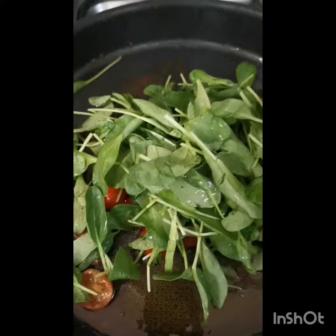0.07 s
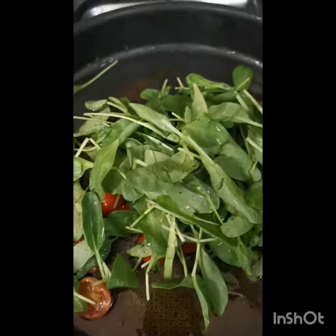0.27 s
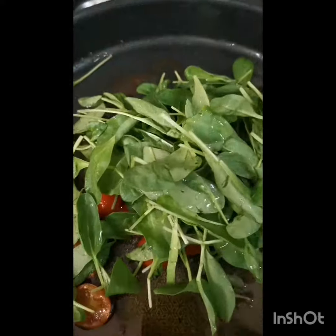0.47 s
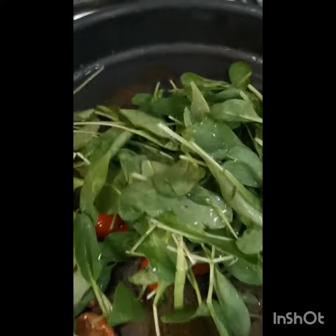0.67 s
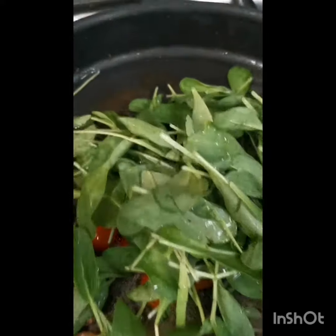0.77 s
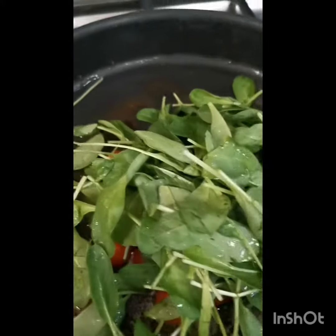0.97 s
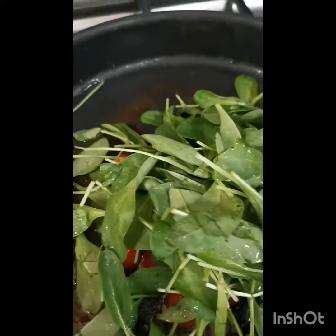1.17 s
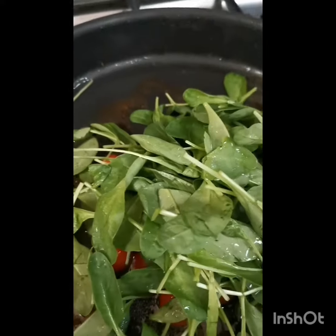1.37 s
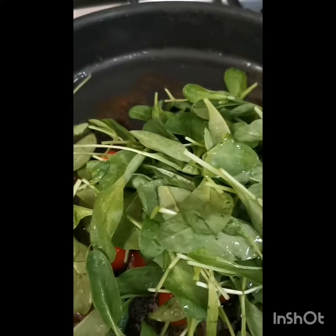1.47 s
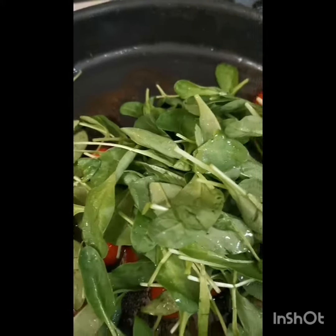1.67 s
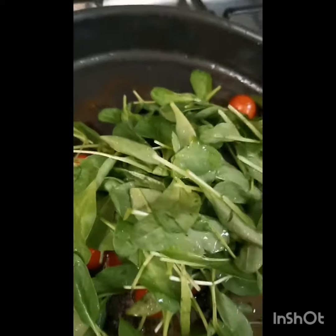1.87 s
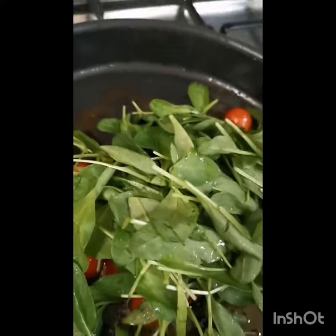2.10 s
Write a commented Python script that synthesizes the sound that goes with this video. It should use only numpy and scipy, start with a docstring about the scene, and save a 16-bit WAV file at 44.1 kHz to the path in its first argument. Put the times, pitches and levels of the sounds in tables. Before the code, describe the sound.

Faint frying hiss and low motor hum, a small bump at left, then a sudden close bang with gritty, crunching knocks and a short room tail; finally fingers tap and creak on the microphone's right side.

```python
"""Leaves sizzle quietly in a pan of butter in a small kitchen: shaped noise, partly tiny pops; a hiss fades first.
A sudden loud bang starts half a second of crackling clatter: noise bursts, scrape, ringing modes, room tail.
Fingers shift on the hand-held microphone: a bump on the left early on, taps and two short creaks on the right
at the end, from clicked resonances and noise. Behind it all: room rumble as noise, and the hum and whine
of a motor, probably a fridge, as wavering sines."""
import sys
import numpy as np
from scipy import signal
from scipy.fft import rfft, irfft
from scipy.io import wavfile

SR = 44100
rng = np.random.default_rng(int(sys.argv[2]) if len(sys.argv) > 2 else 0)


def unload_wav(signal):
    """Save mono or channel-first audio to the path in sys.argv[1] as 16-bit WAV at rate SR, clipped to [-1, 1]."""
    wavfile.write(
        sys.argv[1],
        SR,
        np.round(np.clip(np.atleast_2d(signal).T, -1, 1) * 32767).astype(np.int16),
    )


N = 94197
T = np.arange(N) / SR


def from_db(db):
    """Decibels to gain."""
    return 10 ** (np.asarray(db) / 20)


def rms_one(x):
    """Scale to unit power."""
    return x / np.sqrt(np.mean(x ** 2) + 1e-20)


def level(rows):
    """Gain that follows (time [s], level [dB]) points."""
    return from_db(np.interp(T, *np.transpose(rows)))


def at_hz(points, hz):
    """Read (frequency [Hz], value) points on a log axis."""
    p = np.array(points)
    return np.interp(np.log(hz + 1e-9), np.log(p[:, 0]), p[:, 1])


def lowpass(x, hz, order=2):
    """Butterworth low-pass."""
    return signal.sosfilt(signal.butter(order, min(hz, SR / 2 - 100), fs=SR, output="sos"), x)


# left-right likeness of near and far sound: (frequency [Hz], correlation [-1..1])
NEAR_LIKENESS = [(100, .97), (280, 1), (500, 0.98), (1200, 0.17), (3000, 0.15), (8000, 0.27)]
FAR_LIKENESS = [(30, 1), (120, 0.96), (280, 0.95), (550, 0.1), (1200, 0.036), (3000, 0.05), (8000, 0.9)]


def noise(colour, likeness, grains_per_s=1000, share=0):
    """Coloured stereo noise of unit power, a share of it made of tiny pops of uneven size."""
    hz = np.arange(N // 2 + 1) * SR / N
    share = np.clip(share, 0, 1)
    happens = rng.random((2, N)) < grains_per_s / SR
    size = from_db(2.35 * np.minimum(rng.exponential(1, (2, N)), 4))
    pops = happens * size * rng.choice([-1, 1], (2, N))
    steady = rng.standard_normal((2, N))
    mid, side = rfft(np.sqrt(1 - share) * steady + np.sqrt(share) * rms_one(pops))
    alike = np.clip(at_hz(likeness, hz), -1, 1)
    both = np.sqrt(1 + alike) * mid + np.sqrt(1 - alike) * side * [[1], [-1]]
    return rms_one(irfft(both * from_db(at_hz(colour, hz)), N))


def octaves(x):
    """Split a steady noise into overlapping octaves that add up to it: (Hz, band) pairs."""
    centres_hz = 125 * 2. ** np.arange(7)
    spectrum = rfft(x)
    hz = np.arange(N // 2 + 1) * SR / N
    return [(c, irfft(spectrum * at_hz(np.c_[centres_hz, centres_hz == c], hz), N)) for c in centres_hz]


def strike(s, attack, t60):
    """Envelope: straight rise, exponential fall."""
    rise = np.clip((T - s) / attack, 0, 1)
    return rise * from_db(-60 * np.clip((T - s - attack) / t60, 0, 2))


def linger(power, t60):
    """Let a power envelope die away slowly, keeping its energy."""
    r = np.exp(-np.log(1e6) / (t60 * SR))
    return signal.lfilter([1 - r], [1, -r], power + 1e-18)


def clicks(times, db):
    """Single impulses at the given times and levels."""
    out = np.zeros(N)
    samples = np.clip((np.asarray(times) * SR).astype(int), 0, N - 1)
    np.add.at(out, samples, from_db(db))
    return out


def ring(x, hz, t60):
    """Two-pole resonator: a unit click sets a sine of height 1 ringing."""
    r = np.exp(-np.log(1000) / (t60 * SR))
    w = 2 * np.pi * hz / SR
    return signal.lfilter([0, np.sin(w)], [1, -2 * r * np.cos(w), r * r], x + 1e-18)


# frying loudness: (time [s], level [dB])
SIZZLE_LEVEL = [(0, -52), (.07, -59.5), (.16, -61.5), (.23, -60), (.27, -55), (.41, -63.5), (.52, -52.5),
                (.64, -56.5), (.71, -56.5), (1.03, -58.5), (1.7, -60.5), (2.13, -63)]
# frying spectrum: (frequency [Hz], level [dB])
SIZZLE_COLOUR = [(600, 19), (1200, 1.5), (2000, -6.5), (2700, 6), (3200, 3.5), (3700, 4.5), (4400, -5.5),
                 (5200, 8), (6300, 0.5), (7200, 7.5), (7800, 10), (8700, -1.5), (9800, -8), (11000, -15),
                 (14500, -18), (16000, -38)]
SIZZLE_GRAINS_PER_S, SIZZLE_GRAIN_SHARE = 2500, 0.22


def sizzle():
    """Thousands of tiny steam pops a second merge into a soft hiss."""
    return level(SIZZLE_LEVEL) * noise(SIZZLE_COLOUR, FAR_LIKENESS, SIZZLE_GRAINS_PER_S, SIZZLE_GRAIN_SHARE)


# hiss dying away at the start: (time [s], level [dB])
FADING_HISS_LEVEL = [(0, -47.5), (.04, -53.5), (.08, -58), (.15, -61), (.22, -95)]
# its resonant spectrum: (frequency [Hz], level [dB])
FADING_HISS_COLOUR = [(1000, -29), (2100, -21), (2400, 8), (2700, 7), (3200, -12), (3700, 3), (4200, 1.5),
                      (5000, -6), (6200, -7), (7700, -6), (9000, -24), (12000, -45)]


def fading_hiss():
    """Noise with resonant spectral peaks dies away."""
    return level(FADING_HISS_LEVEL) * noise(FADING_HISS_COLOUR, FAR_LIKENESS)


# bang and after-knocks: (time [s], level [dB], tilt [dB/octave], attack [s], t60 [s])
KNOCKS = [(1.063, -11.5, 2, .0045, 0.068), (1.104, -37, 6.5, 0.0025, 0.12),
          (1.1346, -18.5, -1.5, 0.00206, 0.064), (1.172, -23, -3, 0.0035, 0.031),
          (1.213, -26, -1, 0.00308, 0.035), (1.249, -35, -1.5, 0.0021, 0.11),
          (1.343, -35.5, 4.5, 0.00126, 0.067), (1.352, -31.5, 2, 0.0016, 0.045),
          (1.377, -36.5, 3, 0.0007, 0.1), (1.4531, -32.5, 1, 0.00061, 0.048),
          (1.468, -34, -3, 0.00242, 0.065)]
# crunch spectrum of a knock: (frequency [Hz], level [dB])
KNOCK_COLOUR = [(30, -18), (100, -9), (165, -9), (255, 6), (350, -3), (500, 10), (600, 3), (700, -0.5),
                (820, -8), (1000, -2), (1200, 5), (1500, -6), (2000, -4), (2450, 4.5), (3200, -11),
                (4500, -14.5), (5800, -12.5), (7600, -6), (8700, -13.5), (10000, -31.5), (14500, -35),
                (16000, -55)]
# crackling scrape between the knocks: (time [s], level [dB])
SCRAPE_LEVEL = [(1.06, -58), (1.08, -32.5), (1.16, -36.5), (1.255, -32.5), (1.29, -40), (1.34, -37.5),
                (1.39, -36.5), (1.44, -41.5), (1.475, -41.5), (1.53, -46), (1.6, -61)]
# spectrum of scrape and room tail: (frequency [Hz], level [dB])
CLATTER_COLOUR = [(30, -28), (110, 6), (180, 2), (270, 0), (340, 0), (540, 8), (680, 4), (850, -2),
                  (1100, 2), (1600, 2.5), (2500, 1.5), (3200, -2.5), (4100, -4.5), (5200, -6.5), (6500, -8),
                  (7900, -8), (8800, -18.5), (10200, -33.5), (14500, -43), (16000, -55)]
SCRAPE_GRAINS_PER_S, SCRAPE_GRAIN_SHARE = 1500, 0.91
ROOM_T60_AT_1KHZ_S, ROOM_TREBLE_LOSS, ROOM_DB, ROOM_BUILD_S = 0.73, 0.033, -9.5, 0.02
TILT_FROM_HZ = 670  # tilt is constant below this


def clatter():
    """Each knock is a rough crunch; a gritty scrape joins them, and both fill the room."""
    crunch = octaves(noise(KNOCK_COLOUR, NEAR_LIKENESS, grains_per_s=4400, share=0.52))
    wash = octaves(noise(CLATTER_COLOUR, FAR_LIKENESS))
    scrape = level(SCRAPE_LEVEL)
    out = scrape * noise(CLATTER_COLOUR, NEAR_LIKENESS, SCRAPE_GRAINS_PER_S, SCRAPE_GRAIN_SHARE)
    for (hz, direct), (_, diffuse) in zip(crunch, wash):
        height_octaves = np.log2(max(hz, TILT_FROM_HZ) / 1000)
        power = sum((from_db(db + tilt * height_octaves) * strike(s, attack, t60)) ** 2
                    for s, db, tilt, attack, t60 in KNOCKS)
        delayed = np.interp(T - ROOM_BUILD_S, T, power + scrape ** 2)
        tail = linger(delayed, ROOM_T60_AT_1KHZ_S * 2 ** (-ROOM_TREBLE_LOSS * height_octaves))
        out = out + np.sqrt(power) * direct + from_db(ROOM_DB) * np.sqrt(tail) * diffuse
    return out


# modes of the struck thing: (frequency [Hz], level [dB], t60 [s], left minus right [dB])
MODES = [(232, -10, 0.061, 2.5), (271.6, -16.5, 0.27, -1), (394, -24, 0.43, -7), (495.5, -14, 0.43, -4.5),
         (531, -5.5, 0.063, -11), (617.6, -30, 1, -12), (715, -29.5, 0.69, -8), (1045, -28.5, 0.82, 8),
         (1230, -21, 0.21, 4), (1496, -29.5, 0.58, 3), (1980, -39, 0.4, 5), (2326, -34, 0.2, 14),
         (2710, -30, 0.92, 1), (2755, -45, 0.15, 0)]
EAR_LAG_S, STRIKE_SPREAD_DB = .0003, 1.5


def ringing():
    """The knocks set the same modes ringing, each with small random lags and a fixed level offset per ear."""
    s, db, tilt, attack, _ = np.transpose(KNOCKS)
    out = np.zeros((2, N))
    for hz, mode_db, t60, pan_db in MODES:
        tilt_db = tilt * np.log2(max(hz, TILT_FROM_HZ) / 1000)
        strength_db = db + mode_db + tilt_db + rng.normal(0, STRIKE_SPREAD_DB, len(s))
        when = s + attack * rng.uniform(0.19, 1, len(s))
        lags = rng.uniform(0, EAR_LAG_S, 2)
        out += [ring(clicks(when + lag, strength_db + side * pan_db), hz, t60)
                for lag, side in zip(lags, (.5, -.5))]
    return out


# sharp spits in the clatter: (time [s], level [dB])
SPITS = [(1.0678, -9), (1.0712, -12), (1.0812, -16), (1.1365, -20), (1.3436, -21), (1.3545, -21),
         (1.379, -24), (1.453, -18)]
# low thumps under the main knocks: (time [s], level [dB])
THUMPS = [(1.066, -35), (1.348, -40.5), (1.455, -40)]
SPIT_T60_S, SPIT_DULL_HZ, THUMP_T60_S = 0.0091, 7900, .22


def spits():
    """Noise snaps of a few milliseconds on top of the knocks, and low noise thumps beneath them."""
    snaps = sum(from_db(db) * strike(s, .0001, SPIT_T60_S) for s, db in SPITS)
    thumps = sum(from_db(db) * strike(s, 0.0033, THUMP_T60_S) for s, db in THUMPS)
    bright = noise([(300, -6), (2500, 1.5), (5000, -4.5), (8000, -15.5), (11000, -2)], NEAR_LIKENESS)
    low = noise([(25, -29), (70, 3.5), (120, -2), (180, -5), (400, -22), (1500, -62)], NEAR_LIKENESS)
    return lowpass(snaps * bright, SPIT_DULL_HZ, order=8) + thumps * low


# microphone port resonances: (frequency [Hz], level [dB], t60 [s])
PORT_MODES = [(1460, -15.5, 0.0054), (2220, -10.5, 0.0032), (5400, -28, 0.0008), (7960, -1, 0.0015)]


def port(x):
    """A click right at the microphone port rings for a few milliseconds."""
    rings = sum(from_db(db) * ring(x, hz, t60) * sign
                for (hz, db, t60), sign in zip(PORT_MODES, (1, 1, -1, -1)))
    return lowpass(rings, hz=8700, order=4)


# finger taps on the right: (time [s], thud level [dB], tick level [dB])
TAPS = [(1.855, -21.5, -26), (1.8993, -28.5, -22.5), (1.903, -21, -25), (1.938, -51, -27),
        (1.943, -21.5, -21), (1.9582, -39, -17.5), (2.036, -25.5, -25), (2.047, -42, -25.5),
        (2.0705, -43, -39), (2.0772, -25.5, -36), (2.1087, -70, -34), (2.1126, -54, -24),
        (2.121, -26.5, -43)]
# microphone body: (frequency [Hz], level [dB], t60 [s])
BODY_MODES = [(324, 3.5, 0.004), (133, -11, 0.01)]
# stick-slip creaks of a finger: (time [s], length [s], level [dB])
CREAKS = [(1.965, .0005, -15.5), (1.9718, .0005, -11), (1.9817, .0135, -12), (1.999, .0005, -14),
          (2.0825, .0056, -10), (2.0901, .0028, -14.5)]
TICK_HZ, TICK_T60_S = 1650, 0.001
SLIP_S, SLIP_JITTER = .0019, .2  # median gap, log-normal spread
RUB_DB, RUB_T60_S, LEAK_DB, TOUCH_ROOM_DB = -23, 0.026, -37, -34


def fingers():
    """Soft taps and runs of sharp slips at the right port; little reaches the left."""
    s, thud_db, tick_db = np.transpose(TAPS)
    thuds = sum(from_db(db) * ring(clicks(s, thud_db), hz, t60) for hz, db, t60 in BODY_MODES)
    ticks = clicks(s, tick_db)
    slips = np.zeros(N)
    for start, length, db in CREAKS:
        gaps = SLIP_S * np.exp(SLIP_JITTER * rng.standard_normal(20))
        offsets = np.cumsum(gaps) - gaps
        slips += clicks(start + offsets[offsets < length], db)
    power_decay = from_db(-120 / (RUB_T60_S * SR))
    skin = np.sqrt(signal.lfilter([1], [1, -power_decay], (ticks + slips) ** 2 + 1e-18))
    rub = from_db(RUB_DB) * skin * rms_one(port(rng.standard_normal(N)))
    room_colour = [(300, 0), (1500, -4), (2400, 5), (4000, 3), (6200, -9), (7700, -7), (10000, -30), (16000, -45)]
    room = from_db(TOUCH_ROOM_DB) * skin * noise(room_colour, FAR_LIKENESS)
    direct = thuds + ring(ticks, TICK_HZ, TICK_T60_S) + port(slips) + rub
    return direct * from_db([[LEAK_DB], [0]]) + room


# ticks of the bump on the left: (time [s], level [dB], frequency [Hz], t60 [s])
BUMP_TICKS = [(0.0998, -35, 3960, 0.018), (.112, -40, 7900, 0.014), (.1168, -46, 4000, 0.014)]
# spectrum of its low wobble: (frequency [Hz], level [dB])
WOBBLE_COLOUR = [(15, -3), (38, 7), (90, -2), (150, -18), (400, -38), (1500, -67)]
WOBBLE_S, WOBBLE_END_S, WOBBLE_FADE_S, WOBBLE_DB = .098, .232, .01, -36
BUMP_RIGHT_DB, TICK_CYCLES = -34, 6  # right relative to left; resonator t60 in cycles


def bump():
    """The grip shifts by the left port: three short resonant noise ticks and a low noise wobble."""
    ticks = sum(from_db(db) * strike(s, 0.00017, t60)
                * rms_one(ring(rng.standard_normal(N), hz, TICK_CYCLES / hz))
                for s, db, hz, t60 in BUMP_TICKS)
    gate = np.clip(np.minimum(T - WOBBLE_S, WOBBLE_END_S - T) / WOBBLE_FADE_S, 0, 1)
    wobble = from_db(WOBBLE_DB) * gate * noise(WOBBLE_COLOUR, NEAR_LIKENESS)[0]
    return (ticks + wobble) * from_db([[0], [BUMP_RIGHT_DB]])


def tones(lines, spread, waver):
    """Steady sine lines, slightly wavering in phase; spread sets the phase differences between the ears."""
    out = 0
    for hz, db in lines:
        phase = rng.uniform(0, 2 * np.pi) + spread * rng.uniform(-1.27, 1, (2, 1))
        slow = np.interp(T, np.linspace(0, T[-1], num=24), rng.standard_normal(24))
        out = out + np.sqrt(2) * from_db(db) * np.sin(2 * np.pi * hz * T + phase + waver * slow)
    return out


# room rumble: (time [s], level [dB])
RUMBLE_LEVEL = [(0, -51.5), (.4, -48), (.9, -49), (1.6, -53), (1.8, -46.5), (2.13, -60)]
# its spectrum: (frequency [Hz], level [dB])
RUMBLE_COLOUR = [(20, 5), (40, 4), (80, 6.5), (120, 10.5), (165, -5), (240, 2), (340, -6.5), (420, -7),
                 (650, -22.5), (1200, -16), (3000, -55.5)]
# motor hum lines: (frequency [Hz], level [dB])
HUM_LINES = [(118.4, -58), (236.9, -60), (301.5, -64), (409.1, -67)]
# motor whine lines: (frequency [Hz], level before swell [dB])
WHINE_LINES = [(2649, -73), (2708, -69), (2767, -69), (2944, -72), (5356, -82), (5771, -82), (6476, -84),
               (7714, -79), (8183, -81), (15120, -90)]
# swell of whine and buzz: (time [s], level [dB])
WHINE_SWELL = [(0, -2), (.2, -4), (.45, 2), (.7, 2.5), (1.0, 3.5), (1.6, -1), (1.8, -0.5), (2.13, -4.5)]
# spectrum of the buzz around the whine: (frequency [Hz], level [dB])
BUZZ_COLOUR = [(2300, -32), (2580, -11), (2680, 2), (2780, 3), (2870, -9), (2960, -3), (3150, -30),
               (5500, -32), (5790, -5), (6000, -34), (9000, -50)]
BUZZ_BEFORE_SWELL_DB, MOTOR_LAG_S = -69, .0003


def kitchen():
    """Room rumble and motor hum, reaching the left ear later; high whining lines and the buzz around them."""
    rumble = level(RUMBLE_LEVEL) * noise(RUMBLE_COLOUR, FAR_LIKENESS)
    left, right = rumble + tones(HUM_LINES, spread=0, waver=0.27)
    buzz = from_db(BUZZ_BEFORE_SWELL_DB) * noise(BUZZ_COLOUR, FAR_LIKENESS)
    whine = tones(WHINE_LINES, spread=0.95, waver=0.22) + buzz
    return np.array([np.interp(T - MOTOR_LAG_S, T, left), right]) + level(WHINE_SWELL) * whine


def scene():
    """Pan, clatter, handling and kitchen together; the clatter leans 1 dB left."""
    pan = sizzle() + fading_hiss()
    bang = (clatter() + spits()) * from_db([[.5], [-.5]]) + ringing()
    return pan + bang + fingers() + bump() + kitchen()


CUTOFF_HZ = 15800


def record(dry):
    """Peaks are rounded by tanh and the top is cut by a steep low-pass."""
    rounded = .9 * np.tanh(dry / .9)
    return signal.sosfilt(signal.ellip(10, .1, 70, CUTOFF_HZ, fs=SR, output="sos"), rounded)


dry = scene()
out = record(dry)
unload_wav(out)
```